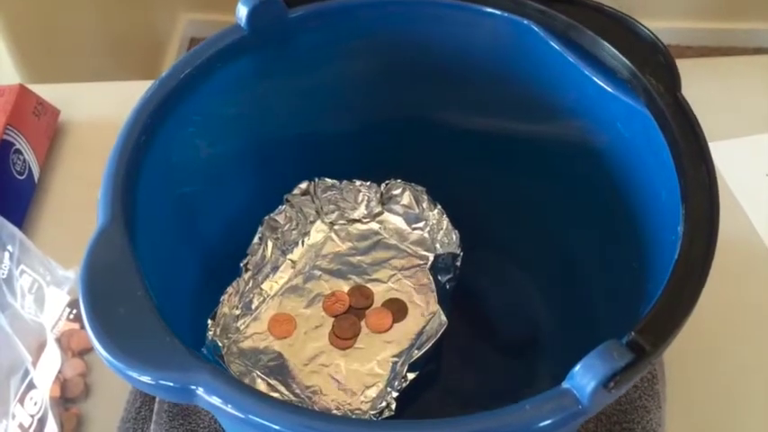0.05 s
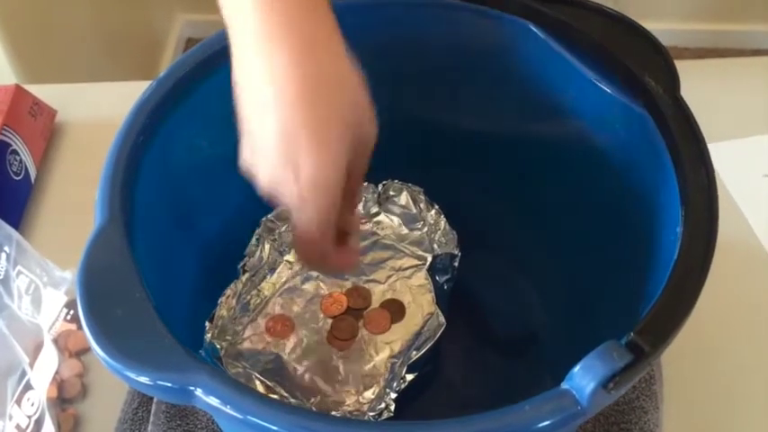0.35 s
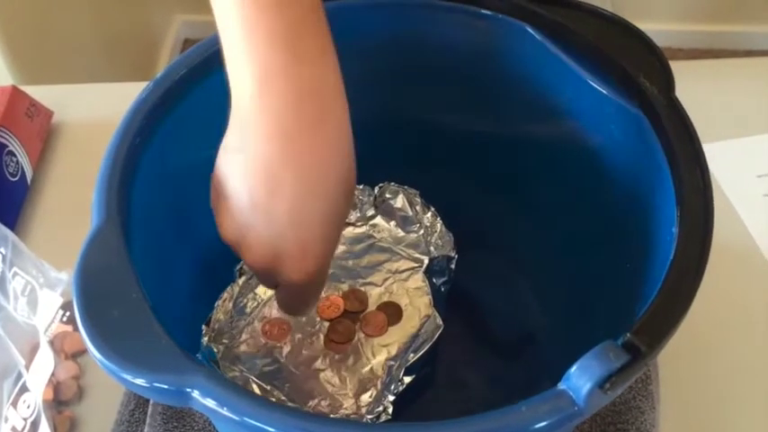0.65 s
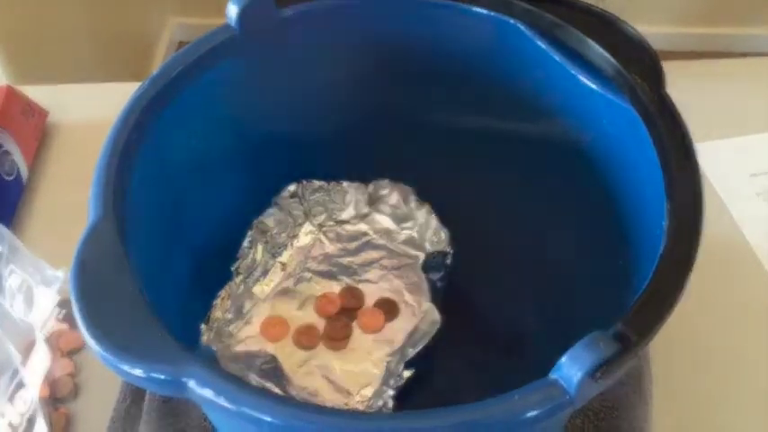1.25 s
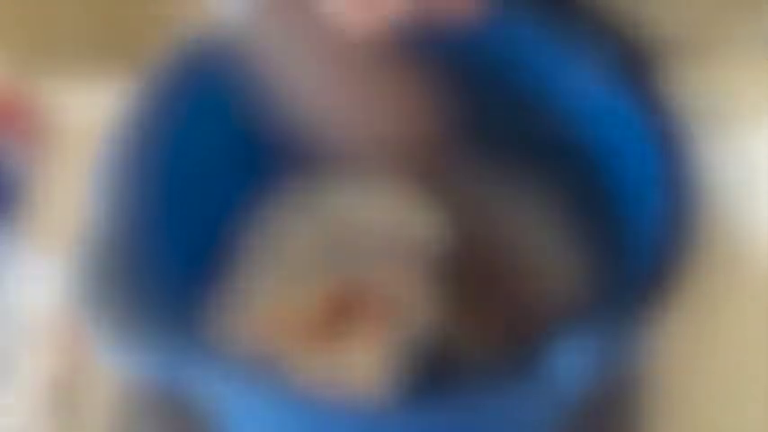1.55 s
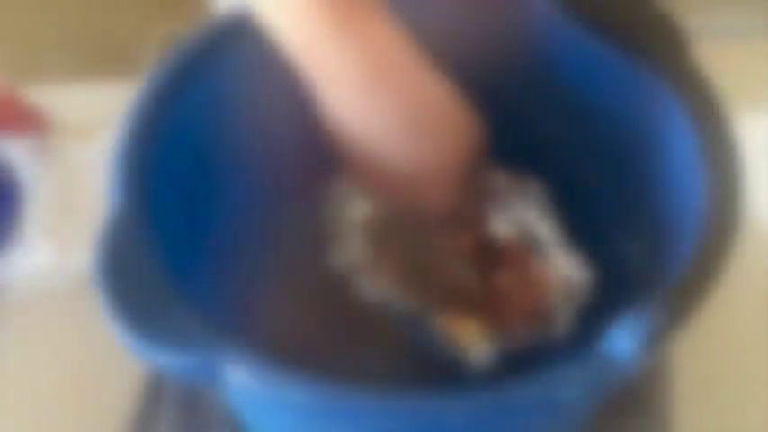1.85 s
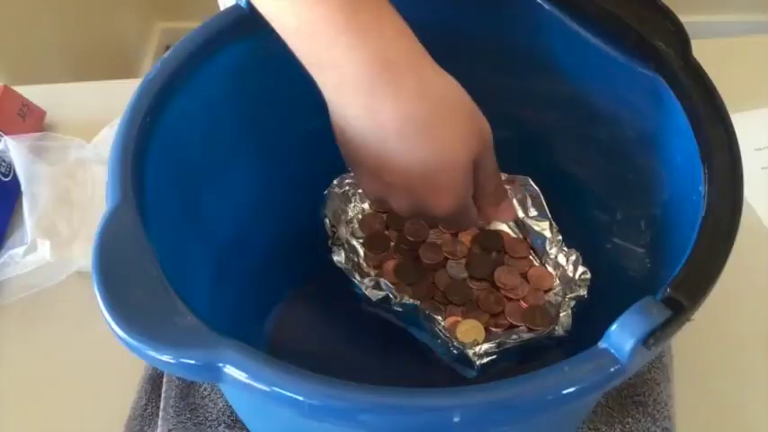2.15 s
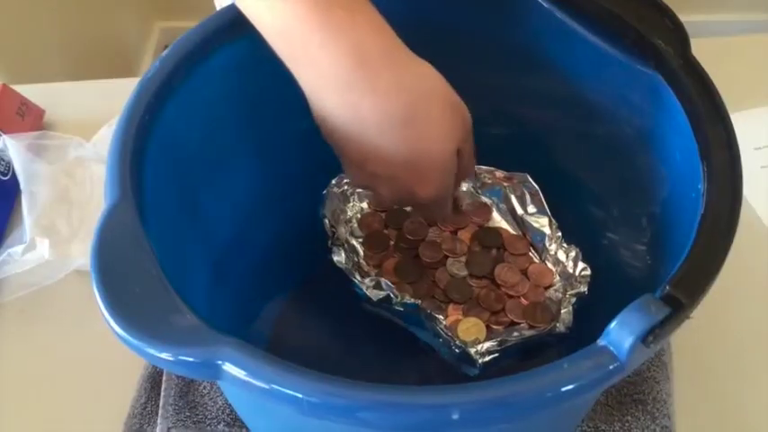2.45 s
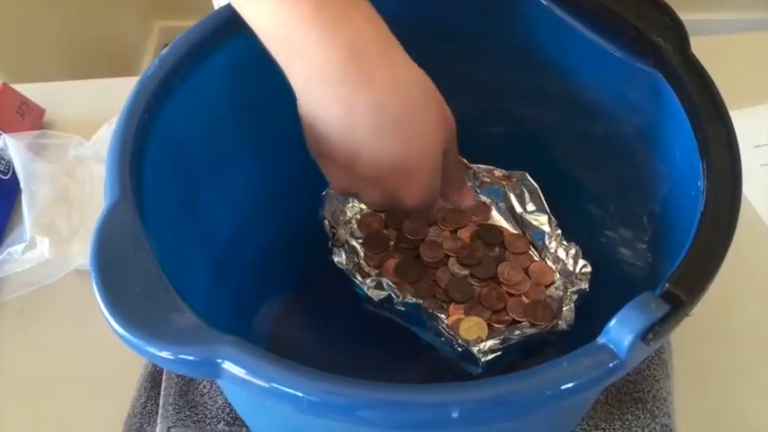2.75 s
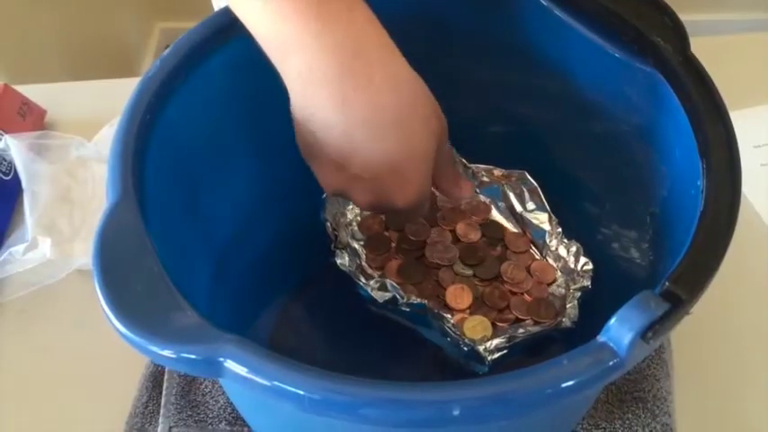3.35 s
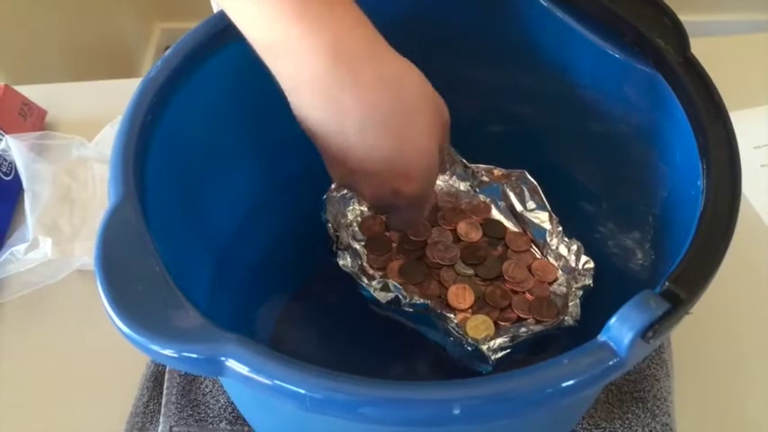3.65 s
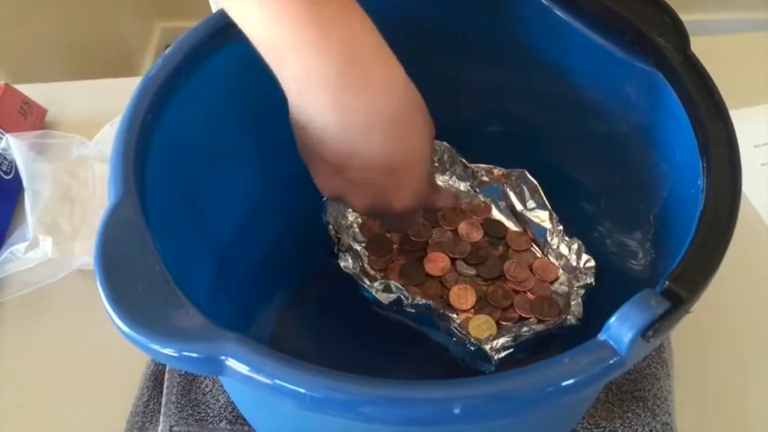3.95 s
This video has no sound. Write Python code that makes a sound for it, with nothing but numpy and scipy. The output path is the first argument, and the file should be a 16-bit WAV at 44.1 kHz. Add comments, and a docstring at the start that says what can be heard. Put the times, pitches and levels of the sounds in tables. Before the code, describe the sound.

Coins drop one at a time onto other coins in a foil boat inside a plastic bucket, each clinking and rattling briefly. A handheld microphone bumps early on, and coins scrape faintly between drops in a quiet room.

```python
"""A quiet room: coins drop one by one on a heap of coins in a foil boat afloat in a plastic bucket.
Each lands with a clink, rattles and rings until it settles, and faintly sounds the bucket's hollow.
Between drops, coins slide in the fingers with a stick-slip rasp.
A hand-held camera knocks and rumbles over a steady hush."""
import sys
import numpy as np
from scipy import signal
from scipy.fft import rfft, irfft
from scipy.io import wavfile
from scipy.ndimage import uniform_filter1d

SR = 44100
rng = np.random.default_rng(int(sys.argv[2]) if len(sys.argv) > 2 else 0)


def unload_audio(sound):
    """Save the sound as a 16-bit wav file, at the path given as the first command line argument."""
    columns = np.transpose(np.atleast_2d(sound))
    # keep every value between -1 and 1, then stretch to whole-number steps
    steps = np.round(np.clip(columns, -1, 1) * 32767)
    wavfile.write(sys.argv[1], SR, steps.astype(np.int16))


N = 176400
T = np.arange(SR // 3) / SR  # time axis of one event
HZ = np.fft.rfftfreq(2048, 1 / SR)  # filter grid
# rattle spectrum: freq_hz, density_db
RATTLE_SPECTRUM = [(200, -74), (1000, -23.5), (1750, -15.5), (2200, -8), (2700, -6.5), (3300, 1),
                   (3800, -4), (4500, -2), (5400, -5.5), (6600, -12), (8500, -12.5), (10300, -20),
                   (11800, -19), (12900, -27.5), (14000, -15), (15300, -30)]


def amp(db):
    """Decibels to gain."""
    return 10 ** (np.asarray(db) / 20)


def unit_rms(x):
    """Scales to rms 1."""
    return x / np.sqrt(np.mean(x ** 2) + 1e-20)


def match(x, reference):
    """Scales x to the energy of the reference."""
    return x * np.linalg.norm(reference) / (np.linalg.norm(x) + 1e-20)


def lookup(points, hz):
    """Interpolates a table over log frequency."""
    freq_hz, value = np.transpose(points)
    return np.interp(np.log(hz + 1), np.log(freq_hz + 1), value)


def add(mix, start_s, sound):
    """Mixes a sound in at start_s."""
    part = mix[max(round(start_s * SR), 0):][:len(sound)]
    part += sound[:len(part)]


def convolve(x, response):
    """Convolution cut to the length of x."""
    return signal.fftconvolve(x, response)[:len(x)]


def colour(x, gain_db):
    """Minimum-phase filter, gains given on HZ."""
    log_gain = np.log(amp(np.r_[gain_db, gain_db[-2:0:-1]]))
    spectrum = np.exp(np.conj(signal.hilbert(log_gain)))
    return convolve(x, np.fft.ifft(spectrum).real)


def shelf(corner_hz):
    """Step on HZ: 0 in the bass, 1 in the treble."""
    return HZ ** 4 / (HZ ** 4 + corner_hz ** 4)


def noise(spectrum):
    """Steady shaped noise, rms 1."""
    gain = amp(lookup(spectrum, np.fft.rfftfreq(N, 1 / SR)))
    return unit_rms(irfft(rfft(rng.standard_normal(N)) * gain, N))


def ring(modes, pitch_ratio=1):
    """Damped sines of a struck object; modes: freq_hz, level_db, t60_s."""
    return sum(amp(db) * np.exp(-np.log(1000) * T / t60_s) * np.sin(2 * np.pi * hz * pitch_ratio * T)
               for hz, db, t60_s in modes)


def detuned(modes, spread):
    """Modes shifted at random, as the coins lie differently."""
    return [(hz * np.exp(spread * rng.standard_normal()), db, t60_s) for hz, db, t60_s in modes]


def contacts(envelope, rate_per_s=3600, spread_db=3.5):
    """Random tiny collisions of uneven force."""
    chance, size, sign = rng.random((3, len(T)))
    force = amp(spread_db * np.minimum(-np.log(size + 1e-9), 3))
    return envelope * (chance < rate_per_s / SR) * force * np.sign(sign - .5)


def dying(length_s, fade_db, settle_s):
    """Envelope: fades over length_s, then stops quickly."""
    fade = amp(fade_db * np.minimum(T / length_s, 1))
    return fade * np.exp(-np.maximum(T - length_s, 0) / settle_s)


def room_hush(level_db=-73):
    """Steady noise of a quiet room."""
    # hush spectrum: freq_hz, density_db
    spectrum = [(15, -49), (45, -5), (100, 0), (427, -14.5), (856, -12), (1810, -15.5), (3260, -13.5),
                (4750, -17), (10300, -26.5), (15000, -26.5)]
    return amp(level_db) * noise(spectrum)


def hand_rumble(lump_db=6.5, lump_s=0.036):
    """The hand shifts on the camera in uneven low lumps."""
    # rumble spectrum: freq_hz, density_db
    spectrum = [(20, -29), (42, 1), (65, 8.5), (190, -10), (450, -34.5), (1500, -52.5)]
    # handling strength: time_s, level_db
    handling = [(0, -91), (.09, -69), (0.118, -51), (.48, -55), (.8, -59), (1.01, -49), (1.46, -70),
                (1.58, -66.5), (1.8, -71.5), (1.901, -109), (2.7, -76), (2.91, -56), (2.96, -74)]
    width = int(lump_s * SR)
    lumps = unit_rms(uniform_filter1d(uniform_filter1d(rng.standard_normal(N), width), width))
    level_db = np.interp(np.arange(N) / SR, *np.transpose(handling))
    return unit_rms(noise(spectrum) * amp(lump_db * lumps)) * amp(level_db)


def coin_slides(width_oct=0.4, hiss_db=-18.5, ring_db=-4.5, t60_s=0.024, spread_db=3):
    """Swells of stick-slip clicks: broad rasp, thin hiss, a few ringing coins."""
    # coins rub each other and the foil: start_s, length_s, level_db, centre_hz, hiss_boost_db
    slides = [(0.178, 0.0067, -52.5, 3580, -12), (0.192, 0.034, -67.5, 3230, -23),
              (0.279, 0.017, -58, 4860, -15), (.377, .006, -64.5, 4900, -22),
              (1.323, 0.038, -60.5, 4650, -6), (1.777, 0.028, -62.5, 4690, 23),
              (1.944, 0.018, -62.5, 3030, -2), (2.352, 0.032, -58.5, 3780, 4),
              (2.395, 0.01, -49.5, 3780, 0.5), (2.449, 0.016, -52, 4000, -2), (2.541, 0.0082, -52, 5100, 0),
              (2.986, 0.018, -54.5, 3830, 9), (3.045, 0.035, -54, 4700, 5.5), (3.662, 0.023, -51, 4160, -4),
              (3.754, 0.032, -54.5, 3420, 0), (3.86, 0.036, -61.5, 2450, -1)]
    # modes of coins pressed between fingers: freq_hz, level_db
    held_modes = [(2550, 3), (3390, 3), (4480, 4)]
    out = np.zeros(N)
    for start_s, length_s, level_db, centre_hz, hiss_boost_db in slides:
        swell = np.sqrt(abs(np.sin(np.pi * np.minimum(T / length_s, 1))))
        band = np.exp(-.5 * (np.log2((HZ + 1) / centre_hz) / width_oct) ** 2)
        gain = (band + amp(hiss_db + hiss_boost_db)) * shelf(corner_hz=2190) + 0.007
        rasp = match(colour(contacts(swell), 20 * np.log10(gain)), swell)
        modes = [(hz, db + spread_db * rng.standard_normal(), t60_s) for hz, db in held_modes]
        rings = match(convolve(rasp, ring(detuned(modes, spread=0.034))), swell)
        add(out, start_s, amp(level_db) * match(rasp + amp(ring_db) * rings, swell))
    return out


def camera_thump(rest_hz=67, t60_s=0.054, sag_ratio=4.6, sag_s=0.002, cutoff_hz=260):
    """Dull thump of a bump; pitch sags to rest_hz."""
    pitch_hz = rest_hz * (1 + sag_ratio * np.exp(-T / sag_s))
    thump = np.sin(2 * np.pi * np.cumsum(pitch_hz) / SR) * np.exp(-np.log(1000) * T / t60_s)
    return signal.sosfilt(signal.butter(2, [rest_hz / 2, cutoff_hz], "band", fs=SR, output="sos"), thump)


def camera_knocks(case_hz=1040, case_t60_s=0.026, thump_delay_s=0.0026):
    """Fingers brush and bump the camera: scrape, crunch, hollow case ring, thump."""
    # bumps: start_s, crunch_db, thump_db, hollow_db, treble_db
    knocks = [(0.1802, -86, -49, -90, 2), (0.4, -66, -57, -57.5, -33), (0.6521, -41.5, -43, -50, 16),
              (0.7167, -32, -25, -45, 6.5), (0.9483, -49.5, -55, -57, 5), (1.079, -42, -32.5, -39, 1)]
    # spectrum of the knocked case: freq_hz, density_db
    case_spectrum = [(300, -29), (500, 1.5), (750, 5.5), (1450, 9.5), (2100, -8), (3000, 0), (4500, -14),
                     (15000, -39.5)]
    brush_db, brush_s, scrape_db, scrape_s, settle_s = -12.5, 0.013, -21, 0.014, 0.00024
    blow = dying(length_s=0.0034, fade_db=0, settle_s=settle_s)
    brush = amp(brush_db) * dying(brush_s, 0, settle_s) * T / brush_s
    scrape = amp(scrape_db) * np.exp(-abs(T - T.mean()) / scrape_s)  # peaks at the bump
    thump = camera_thump()
    out = np.zeros(N)
    for start_s, crunch_db, thump_db, hollow_db, treble_db in knocks:
        case_db = lookup(case_spectrum, HZ) + treble_db * shelf(corner_hz=1800)
        crunch = match(colour(blow * rng.standard_normal(len(T)), case_db), blow)
        hollow = match(convolve(crunch, ring([(case_hz, 0, case_t60_s)])), blow)
        brushing = match(colour(contacts(brush), case_db), brush)
        scraping = match(colour(contacts(scrape), case_db + lookup(RATTLE_SPECTRUM, HZ) / 2), scrape)
        add(out, start_s - T.mean(), amp(crunch_db) * scraping)
        add(out, start_s - brush_s, amp(crunch_db) * brushing)
        add(out, start_s, amp(crunch_db) * crunch + amp(hollow_db) * hollow)
        add(out, start_s + thump_delay_s, amp(thump_db) * thump)
    return out


def heap_strike(pitch_ratio, low_cut_hz=1510):
    """One hard contact with the heap: bright ringing modes, with the bass below low_cut_hz removed."""
    # heap modes: freq_hz, level_db, t60_s
    modes = [(3030, -12.5, 0.028), (3329, 10, 0.01), (3780, 4.5, 0.0079), (3960, -11.5, 0.017),
             (5260, -5.5, 0.017), (8080, -3, 0.0047), (13030, -0.5, 0.0041)]
    low_cut = signal.butter(2, low_cut_hz, "high", fs=SR, output="sos")
    return signal.sosfilt(low_cut, ring(modes, pitch_ratio))


def coin_rings(hits, centre_hz=13020, t60_s=0.017, turn_s=0.0074, count=6):
    """Touching coins take turns to ring, each at its own pitch."""
    turn = (T / turn_s).astype(int) % count
    return sum(convolve(hits * (turn == k), ring(detuned([(centre_hz, 0, t60_s)], spread=0.0385)))
               for k in range(count))


def bucket_ring():
    """Impulse response of the bucket's hollow."""
    # cavity modes: freq_hz, level_db, t60_s
    modes = [(168, -8, 0.4), (362, 9, 0.06), (798, 0, 0.1), (857, 0, 0.11), (1359, -3, 0.1),
             (1535, -5, 0.1)]
    return ring(detuned(modes, spread=0.017))


def coin_rattle(envelope, pitch_ratio, treble_db, heap_hz=3384, heap_t60_s=0.026):
    """A coin chatters: collisions excite foil, heap, coins and bucket."""
    heap_db, coins_db, bucket_db = -13.5, -9, -22.5
    hits = contacts(envelope)
    foil = match(colour(hits, lookup(RATTLE_SPECTRUM, HZ / pitch_ratio)), envelope)
    heap = match(convolve(hits, ring([(heap_hz, 0, heap_t60_s)])), envelope)
    coins = match(coin_rings(hits), envelope)
    bucket = match(convolve(contacts(envelope), bucket_ring()), envelope)
    metal = foil + amp(heap_db) * heap + amp(coins_db) * coins
    return colour(metal, treble_db * shelf(corner_hz=6400)) + amp(bucket_db) * bucket


def coin_drops(rise_s=0.00048, push_s=0.016, tick_db=-9):
    """Coins clink, rattle and sound the bucket, with short clatters on or after landing."""
    # landings: start_s, clink_peak_db, rattle_db, rattle_s, bucket_db, pitch_ratio, treble_db
    drops = [(0.8913, -30.5, -50, 0.049, -47, 0.88, 6.5), (1.5575, -23.5, -41.5, 0.082, -54, 0.99, -2.5),
             (2.1172, -21, -39, 0.069, -56.5, 0.97, 4), (2.7134, -18, -36.5, 0.078, -51.5, 1.02, -1.5),
             (3.1573, -14, -34.5, 0.1, -49.5, 1.035, -3.5), (3.329, -15, -33, 0.048, -48.5, 1.044, -3),
             (3.8997, -17.5, -35.5, 0.076, -56, 1.022, -5.5)]
    # short clatters, the rough burst as a coin lands or a later bounce:
    # start_s, level_db, length_s, treble_db
    clatters = [(0.8886, -33, 0.01, -32), (0.963, -52.5, 0.011, -13), (1.628, -52, 0.027, -16),
                (2.118, -33.5, 0.0055, 2.5), (2.1607, -41.5, 0.021, -3.5), (2.729, -38.5, 0.012, 1.5),
                (2.7717, -43.5, 0.007, -5), (3.251, -40.5, 0.0056, -4), (3.393, -39.5, 0.011, -0.5),
                (3.416, -45.5, 0.017, -4.5), (3.8995, -34, 0.01, -4.5), (3.965, -41.5, 0.0061, 1.5),
                (3.982, -43, 0.045, -5)]
    out = np.zeros(N)
    for start_s, clink_peak_db, rattle_db, rattle_s, bucket_db, pitch_ratio, treble_db in drops:
        clink = heap_strike(pitch_ratio) * np.minimum(T / rise_s, 1)
        add(out, start_s, amp(clink_peak_db) * clink / abs(clink).max())
        envelope = amp(rattle_db) * dying(rattle_s, fade_db=-18, settle_s=0.004)
        add(out, start_s, coin_rattle(envelope, pitch_ratio, treble_db))
        add(out, start_s, amp(bucket_db) * match(bucket_ring(), np.exp(-T / push_s)))
    for start_s, level_db, length_s, treble_db in clatters:
        *_, pitch_ratio, _ = min(drops, key=lambda drop: abs(drop[0] - start_s + length_s))  # nearby drop
        envelope = amp(level_db) * dying(length_s, fade_db=-4, settle_s=0.0037)
        add(out, start_s, coin_rattle(envelope, pitch_ratio, treble_db))
        add(out, start_s, amp(level_db + tick_db) * heap_strike(pitch_ratio))
    return out


def reflections(x, wall_db=-16, wall_decay_s=0.032, echoes_per_s=2000, room_db=-15.5):
    """Adds quick echoes off the bucket wall and a faint room tail."""
    # room decay: freq_hz, t60_s
    room_decay = [(150, 0.5), (1000, 0.37), (3300, 0.42), (6000, 0.33), (13000, 0.15)]
    echoes = rng.standard_normal(len(T)) * (rng.random(len(T)) < echoes_per_s / SR)
    wall = echoes * np.exp(-T / wall_decay_s) * (T > .001)
    hz, time_s, bands = signal.stft(rng.standard_normal(SR), SR, nperseg=256)
    decay = np.exp(-np.log(1000) * time_s / lookup(room_decay, hz)[:, None])
    _, tail = signal.istft(bands * decay, SR, nperseg=256)
    return x + convolve(x, match(wall, amp(wall_db))) + convolve(x, match(tail, amp(room_db)))


def scene():
    """Coins in the bucket, camera handling and room hush; mono."""
    coins = reflections(coin_drops() + coin_slides())
    return (coins + camera_knocks() + hand_rumble() + room_hush())[None]


def record(dry):
    """Steep low-pass."""
    cutoff_hz = 15350
    low_pass = signal.firwin(401, cutoff_hz, window=("kaiser", 8), fs=SR)
    return signal.oaconvolve(dry, low_pass[None], "same")


dry = scene()
out = record(dry)
unload_audio(out)
```